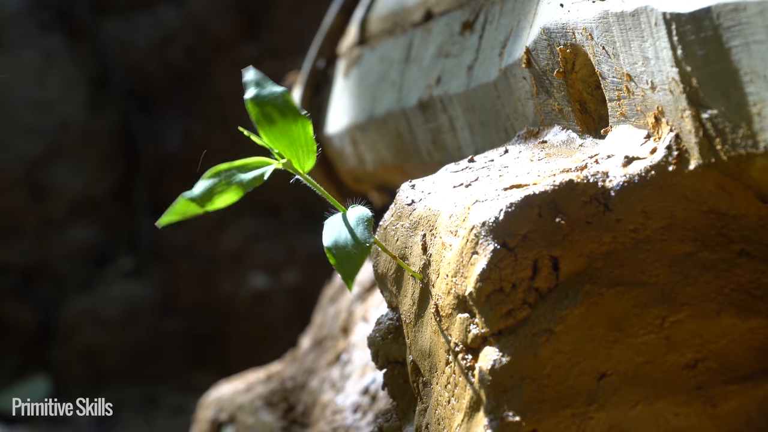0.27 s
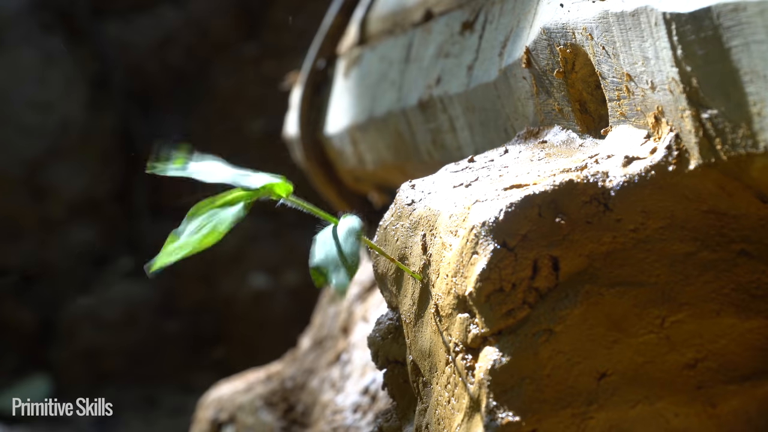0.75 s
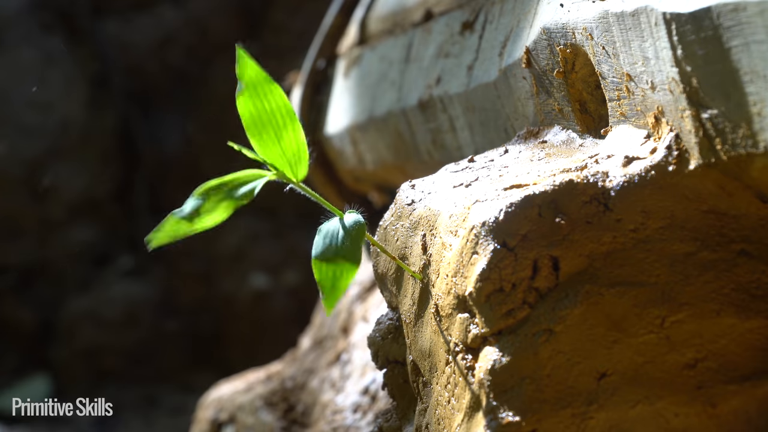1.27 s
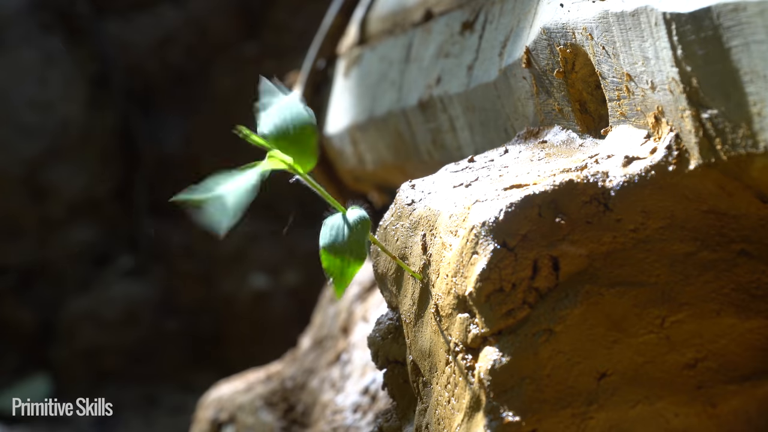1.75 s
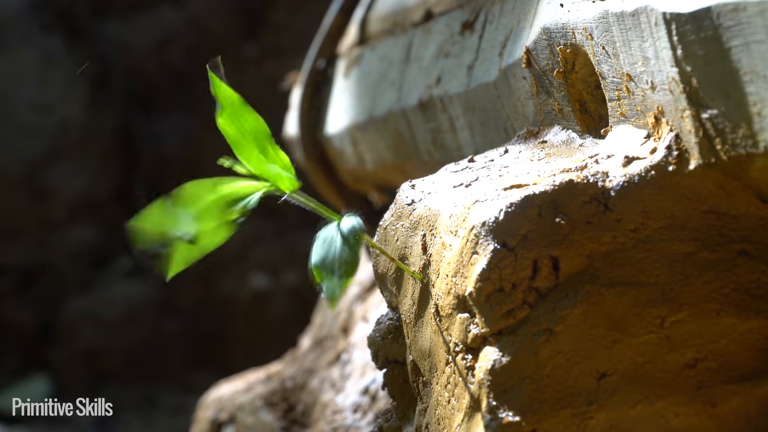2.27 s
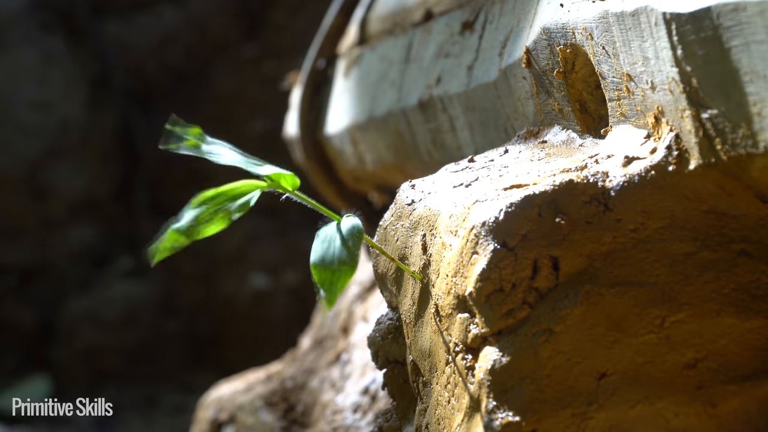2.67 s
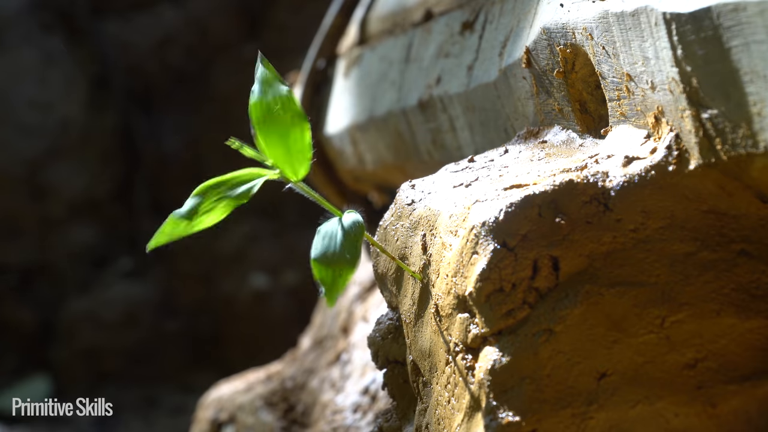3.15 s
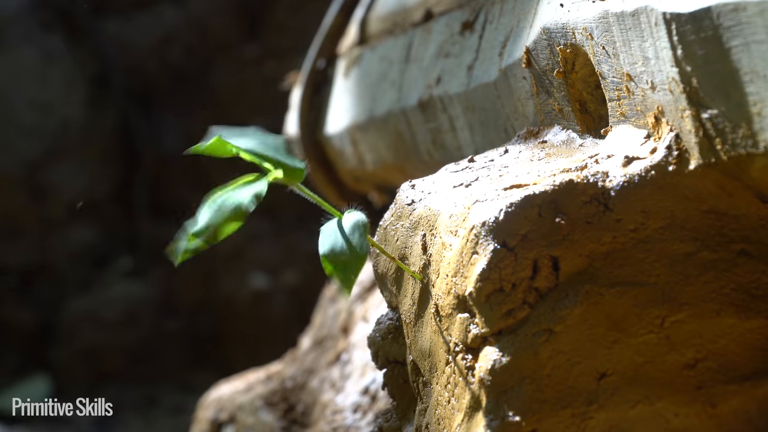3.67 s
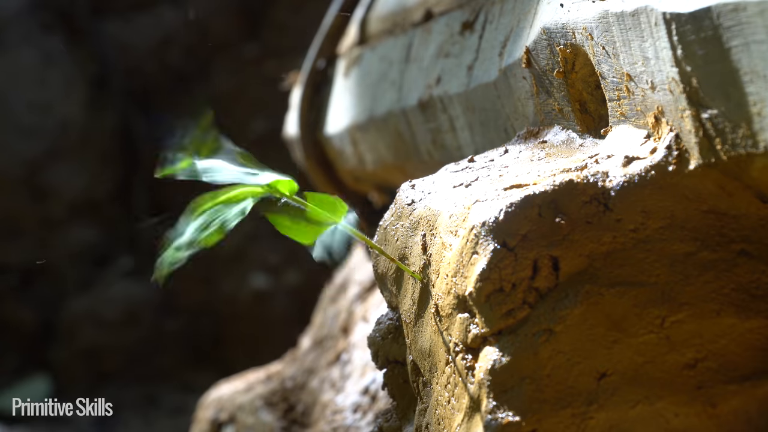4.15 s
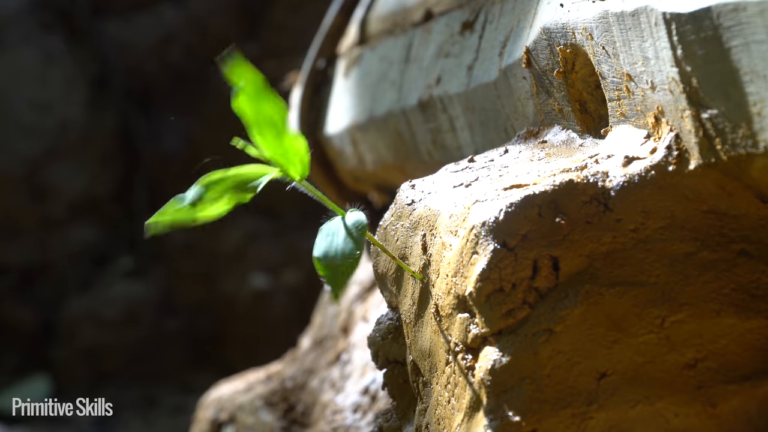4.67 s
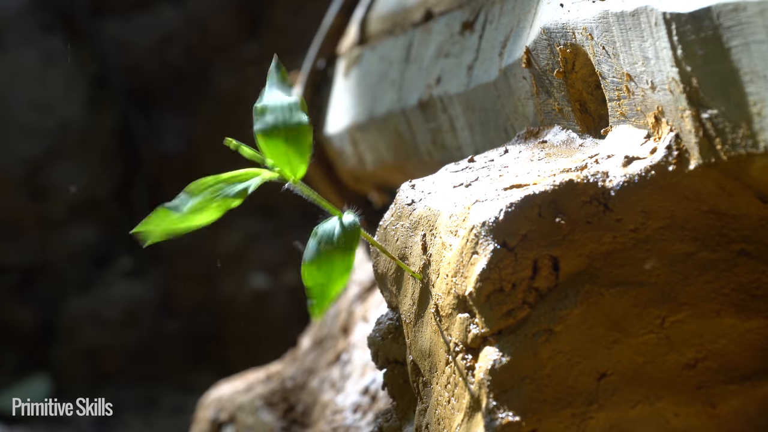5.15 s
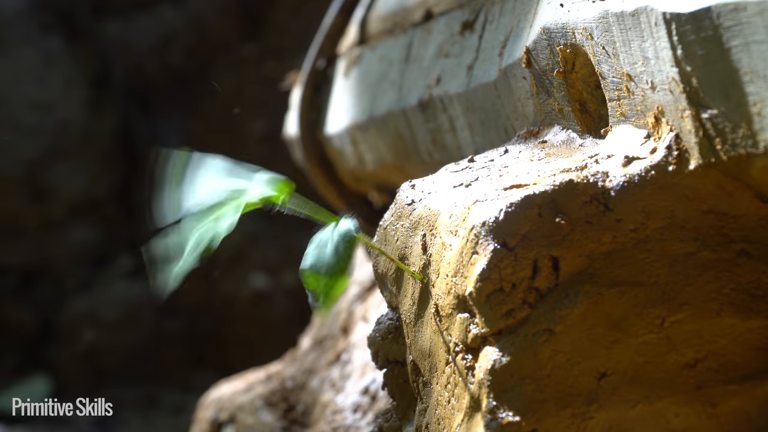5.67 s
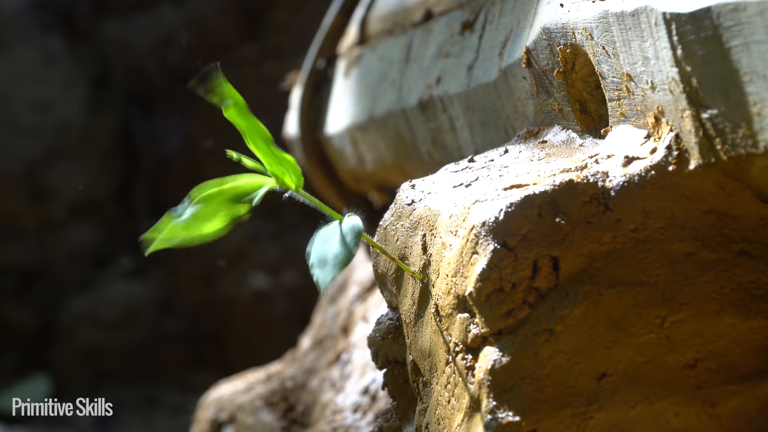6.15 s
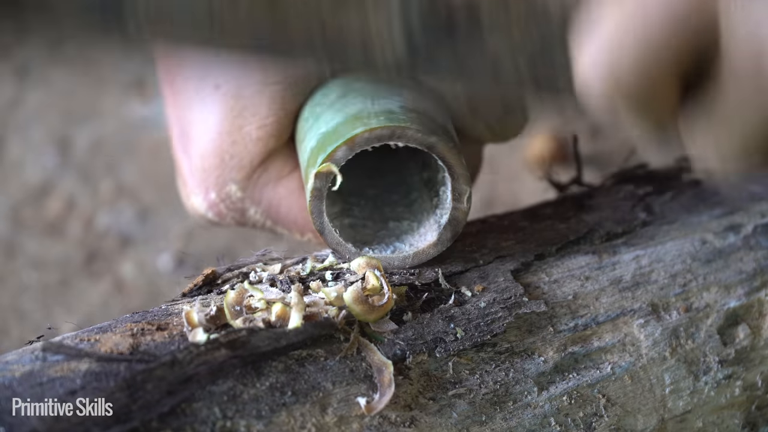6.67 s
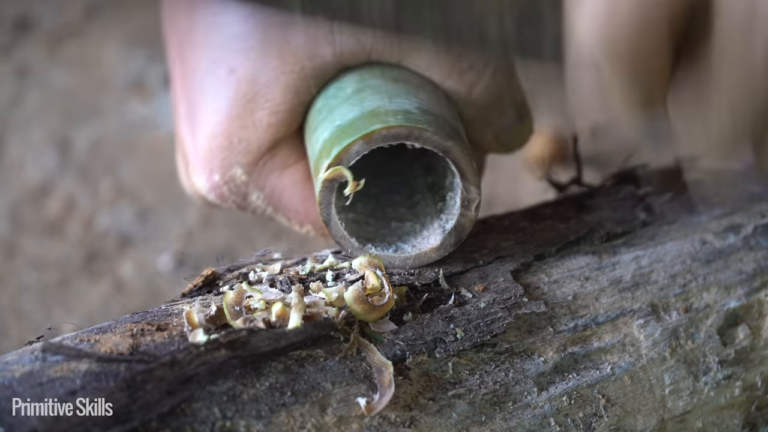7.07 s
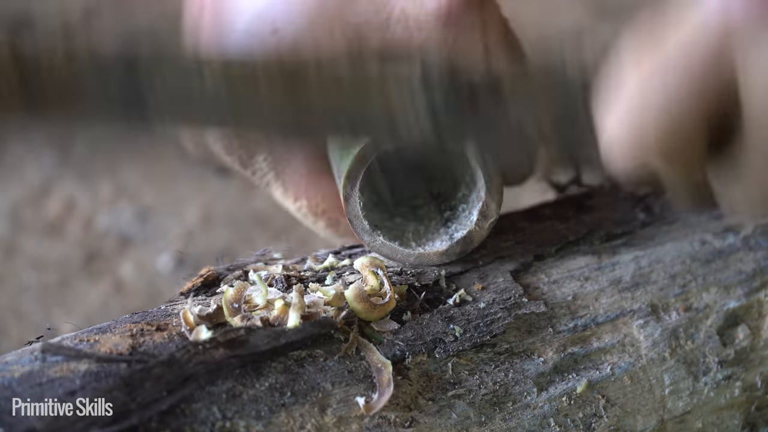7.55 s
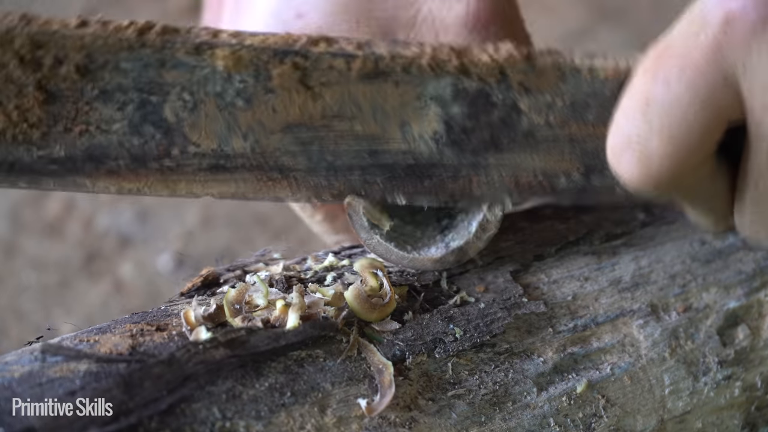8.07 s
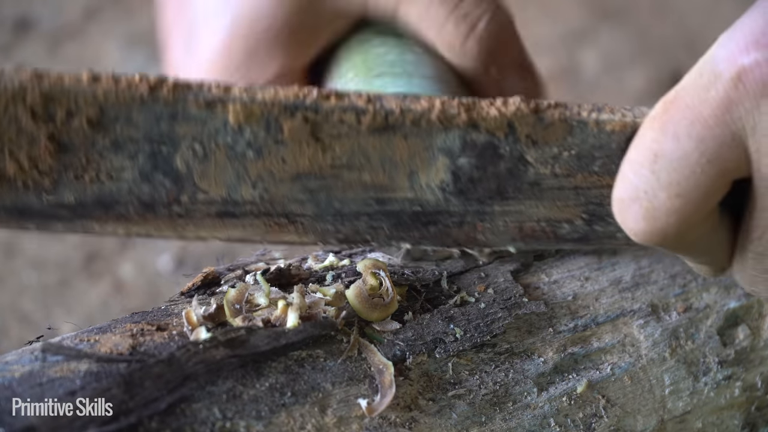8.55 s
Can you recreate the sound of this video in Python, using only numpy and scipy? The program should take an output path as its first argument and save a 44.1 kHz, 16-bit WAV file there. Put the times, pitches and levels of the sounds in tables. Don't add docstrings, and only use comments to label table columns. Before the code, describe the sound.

Breathy air whistles around nine hundred hertz and hisses through valve holes as a bellows is pushed and pulled, with wooden slaps and thumps starting the pushes and small ticks and pops starting the pulls. Then a hard cut to a log: quick, dry blade hits on bamboo, about three per second, each with a brief chattering slice and gritty scrape, plus a rattling knock midway. Close, dry outdoor sound, soft stream murmur, loudest blows slightly flattened.

```python
import sys
import numpy as np
from scipy import signal
from scipy.fft import rfft, irfft
from scipy.io import wavfile
from scipy.ndimage import uniform_filter1d

SR = 44100
rng = np.random.default_rng(int(sys.argv[2]) if len(sys.argv) > 2 else 0)


def elevation(decibels):
    levels = np.asarray(decibels, float)
    return 10 ** (levels / 20)


def transcribe(u):
    v = np.clip(np.atleast_2d(u).T, -1, 1)
    q = np.round(v * 32767).astype(np.int16)
    wavfile.write(sys.argv[1], SR, q)


N = 388080


def walk(rate):
    hold = int(SR / rate)
    steps = np.repeat(rng.standard_normal(N // hold + 1), hold)
    return 0.95 * uniform_filter1d(uniform_filter1d(steps, hold), hold)[:N]


def unit(x):
    return x / np.sqrt(np.mean(x ** 2))


def resonate(x, peaks):
    out = 0
    for k, (hz, width, db) in enumerate(peaks):
        out = out + (-1) ** k * elevation(db) * signal.lfilter(*signal.iirpeak(hz, hz / width, SR), x)
    return out


def lift(x, peaks):
    return x + sum(elevation(db) * 3 * resonate(x, [(hz, width, 0)]) for hz, width, db in peaks)


def coloured(x, spectrum, flicker_db, rate):
    hz, db = np.transpose(spectrum)
    octave = np.log2(np.maximum(np.fft.rfftfreq(N, 1 / SR), 1))
    shaped = rfft(x) * elevation(np.interp(octave, np.log2(hz), db, left=-120, right=-120))
    out = np.zeros(N)
    for centre in np.arange(np.log2(hz[0]) - 0.5, np.log2(hz[-1]) + 0.5, 0.5):
        band = irfft(shaped * np.clip(1 - 2 * abs(octave - centre), 0, 1), N)
        out += band * elevation(flicker_db * walk(rate))
    return unit(out)


def strike(events, modes, contact_ms, detune, sides=1):
    out, t = np.zeros(N), np.arange(8192) / SR
    push = np.hanning(int(contact_ms * SR / 1000) + 3)
    hz, gain_db, t60 = np.transpose(modes)[:, :, None]
    facing = sides ** np.arange(len(modes))[:, None]
    chances = rng.standard_normal((len(events), 2, len(modes), 1))
    for (s, db), (level_chance, pitch_chance) in zip(events, chances):
        decay = np.exp(-np.log(1000) * t / np.minimum(t60, 0.08))
        rings = facing * elevation(gain_db + 2 * level_chance) * decay
        swing = np.sin(2 * np.pi * hz * (1 + detune * pitch_chance) * t)
        hit = -np.convolve((rings * swing).sum(0), push)
        i = int(s * SR)
        out[i:i + len(hit)] += elevation(db) * hit / abs(hit).max()
    return out


def gate(t, start, end, rise, fall):
    return np.clip((t - start) / rise, 0, 1) * np.exp(-np.clip(t - end, 0, None) / fall)


# (frequency [Hz], level [dB])
YARD_COLOUR = [(15, -31), (25, -2), (117, -5), (287, -3.5), (898, -3.5), (1680, -16), (3300, -13),
               (3580, -15), (3990, -20.5), (5240, -20), (5840, -26.5), (13200, -34.5), (16400, -46)]
# (frequency [Hz], level [dB])
LOG_COLOUR = [(20, -10), (90, -9.5), (200, -6), (450, -6.5), (650, -3), (900, -1.5), (1150, -11),
              (2200, -17), (3300, -14), (4200, -18), (6000, -27.5), (10000, -32.5), (15000, -41),
              (16400, -53)]
# (time [s], length [s], frequency [Hz], level [dB])
PUFFS = [
    (2.38, .06, 55.7, -44),
    (5.151, .12, 76, -32.5),
    (5.324, 0.052, 81, -34.5),
    (7.795, 0.021, 104, -32),
    (8.383, .04, 90, -35),
]


def outdoors(t):
    near_log = np.clip((t - 6.58) / 0.01, 0, 1)
    yard = elevation(-40.5) * coloured(rng.standard_normal(N), YARD_COLOUR, 1.8, 9)
    bank = elevation(-37) * coloured(rng.standard_normal(N), LOG_COLOUR, 1.2, 11)
    puffs = 0
    for s, length, hz, db in PUFFS:
        puffs = puffs + elevation(db) * gate(t, s, s + length, 0.014, 0.014) * np.sin(2 * np.pi * hz * (t - s))
    return (1 - near_log) * yard + near_log * bank + puffs


def stroke_levels(t, strokes, flow, spout, barrel, leak):
    jet_gain, spout_gain, barrel_gain = np.zeros((3, N))
    leak_s, leak_db = leak
    for start, end, force_db, sag_db in strokes:
        on = (t >= start) & (t < end)
        share = (t[on] - start) / (end - start)
        sag = sag_db * np.exp(-((share - 0.44) / 0.15) ** 2)
        flow_db = np.interp(share, *np.transpose(flow)) + sag
        jet_gain[on] = elevation(force_db + flow_db)
        for gain, (db, slope, drift_db) in ((spout_gain, spout), (barrel_gain, barrel)):
            gain[on] = elevation(force_db + db + slope * flow_db + drift_db * share)
        spout_gain[(t >= start - leak_s) & (t < start)] = elevation(leak_db)
    return uniform_filter1d(np.array([jet_gain, spout_gain, barrel_gain]), size=400)


# (frequency [Hz], width [Hz], level [dB])
BARREL_PEAKS = [(270, 49, 0.71), (111, 147, 3.2)]
# (frequency [Hz], level [dB])
RUMBLE_COLOUR = [(20, -17), (60, -21.5), (130, -11.5), (220, -4.5), (420, -6.5), (650, -4.5), (820, -1),
                 (1000, -39)]


def barrel_rumble(push_gain, pull_gain):
    noise = rng.standard_normal(N)
    tumble = np.where(push_gain > pull_gain, noise, 0.3 * lift(noise, BARREL_PEAKS))
    return (push_gain + pull_gain) * coloured(tumble, RUMBLE_COLOUR, 2.85, 18)


# (frequency [Hz], level [dB])
PUSH_COLOUR = [(900, 1), (1080, -4.5), (2000, -2.5), (3200, -4.5), (4300, -10.5), (4800, -19.5),
               (6100, -24), (6700, -28.5), (12000, -32.5), (16000, -51)]
# (frequency [Hz], level [dB])
PULL_COLOUR = [(900, -21), (1080, -6.5), (1400, -0.5), (2400, -5.5), (3200, -7), (4300, -14.5), (4900, -19),
               (6100, -25.5), (12000, -32), (16000, -40)]
# (frequency [Hz], width [Hz], level [dB])
PUSH_HOLE = [(1210, 112, -2.5), (1556, 280, -11.5), (2127, 44, -8), (2577, 31, -11), (3065, 320, -14.5),
             (5790, 140, -12)]
# (frequency [Hz], width [Hz], level [dB])
PULL_HOLE = [(1210, 155, -8.5), (2060, 65, -8.5), (2430, 110, -8.5), (3114, 63, -8.5), (4100, 93, -12)]


def valve_hiss(push_gain, pull_gain):
    push = coloured(lift(rng.standard_normal(N), PUSH_HOLE), PUSH_COLOUR, 1.2, 15)
    pull = coloured(lift(rng.standard_normal(N), PULL_HOLE), PULL_COLOUR, 1.2, 15)
    return push_gain * push + pull_gain * pull


# (frequency [Hz], width [Hz], level [dB])
SPOUT_NOTES = [(905.3, 37.6, -2.5), (830.5, 62.5, -9.5), (775.4, 57, -13.5)]
# (time [s], half length [s], level [dB])
SPOUT_SWELLS = [(0, 0.0083, 15), (0.4, 0.018, 8), (0.733, 0.052, 7), (1.041, 0.051, 9), (1.37, .008, -6),
                (1.503, 0.033, -8), (1.595, .007, -5), (1.765, .008, -6), (1.63, 0.038, 5),
                (1.663, .008, 0), (1.865, 0.046, 4.5), (2.256, 0.03, 3), (2.782, 0.027, 5),
                (3.225, 0.035, 1.5), (3.375, .007, -7), (3.412, .02, 6), (3.51, .03, -4), (3.56, .03, -2),
                (3.997, 0.032, 6), (4.54, .02, 7.5), (4.79, 0.011, 6), (5.004, 0.017, 5), (5.418, .03, 2),
                (5.508, 0.011, -12), (5.743, 0.027, 7.5), (6.011, 0.043, 11), (6.294, 0.042, 5)]
# (time [s], length [s], level [dB])
SPOUT_GASPS = [(0.297, .02, -31), (0.42, 0.01, -14), (1.268, 0.0032, -12.5), (1.278, 0.0037, -15),
               (1.388, 0.019, -20), (1.435, 0.014, -19.5), (1.612, 0.028, -15.5), (1.675, 0.011, -15),
               (1.785, 0.0051, -12.5), (1.807, 0.011, -18), (1.83, .014, -16.5), (3.07, 0.019, -20),
               (3.173, 0.013, -18.5), (3.33, 0.014, -18), (3.39, 0.037, -15), (3.444, 0.015, -16),
               (3.463, 0.015, -14.5), (3.543, 0.033, -15.5), (3.596, 0.018, -15), (3.672, 0.013, -17.5),
               (4.611, 0.0066, -18), (4.921, 0.01, -17.5), (5.133, 0.018, -18.5), (5.164, 0.0068, -15.5),
               (5.195, 0.0093, -12.5), (5.218, 0.009, -12.5), (5.242, 0.027, -16.5), (5.305, 0.016, -17.5),
               (5.402, 0.039, -17.5), (5.519, 0.018, -24)]


def spout_song(t, gain):
    swell_db = sum(np.interp(t, [s - 2 * half, s, s + 2 * half], [0, db, 0]) for s, half, db in SPOUT_SWELLS)
    eddies = resonate(rng.standard_normal(N) * elevation(2.46 * walk(35)), [(787, 240, 0)])
    breath = unit(resonate(eddies, SPOUT_NOTES))
    gasps = sum(elevation(db) * gate(t, s, s + length, 0.0013, 0.0034) for s, length, db in SPOUT_GASPS)
    note_hz = 902 + 9 * walk(60)
    gasp_note = np.sin(2 * np.pi * np.cumsum(note_hz) / SR) * elevation(1.5 + 0.79 * walk(150))
    song = gain * elevation(swell_db) * breath / (1 + 9.0 * gasps) + gasps * gasp_note
    return signal.lfilter(*signal.iirnotch(973, 973 / 65, SR), song)


# (flap opens [s], air stops [s], force [dB], sag of the arm in mid-stroke [dB])
PUSH_STROKES = [
    (.361, 1.201, -24.5, -6),
    (2.14, 2.958, -24, -3),
    (3.907, 4.745, -25, -0.5),
    (5.675, 6.49, -25.5, 0.5),
]
# (flap opens [s], air stops [s], force [dB], sag of the arm in mid-stroke [dB])
PULL_STROKES = [
    (-.53, 0.2, -33.5, -0.23),
    (1.274, 2.02, -31, 0.27),
    (3.025, 3.79, -31.5, -0.34),
    (4.808, 5.567, -31.5, -0.17),
]
# (share of the stroke [0-1], level under full flow [dB])
PUSH_AIR = [(0, -13.5), (.04, -4.5), (.12, 1.5), (.7, -0.5), (.9, -5.5), (.96, -16), (1, -29)]
# (share of the stroke [0-1], level under full flow [dB])
PULL_AIR = [(0, -7.5), (.06, -12), (.1, -4), (.28, 1), (0.858, -2), (.96, -10.5), (1, -14)]
# (level over the jet [dB], slope [dB per dB], drift over the stroke [dB])
PUSH_SPOUT = (-0.8, 0.43, -3)
PULL_SPOUT = (5.2, 0.76, 4.9)
PUSH_BARREL = (-7.5, 0.5, -2)
PULL_BARREL = (3, .9, -2.5)
# (lead [s], level [dB])
PUSH_LEAK = (0.054, -37)
PULL_LEAK = (0.024, -38.5)


def bellows(t):
    push = stroke_levels(t, PUSH_STROKES, PUSH_AIR, PUSH_SPOUT, PUSH_BARREL, PUSH_LEAK)
    pull = stroke_levels(t, PULL_STROKES, PULL_AIR, PULL_SPOUT, PULL_BARREL, PULL_LEAK)
    push_jet, push_spout, push_barrel = push
    pull_jet, pull_spout, pull_barrel = pull
    song = spout_song(t, push_spout + pull_spout)
    return song + valve_hiss(push_jet, pull_jet) + barrel_rumble(push_barrel, pull_barrel)


# (time [s], level [dB])
SETTLE_TIMES = [
    (.213, -23.5),
    (2.013, -22),
    (3.796, -24.5),
    (5.58, -22),
]
# (time [s], level [dB])
TICK_TIMES = [
    (1.282, -5),
    (3.047, -6.5),
    (4.816, -5),
]
# (time [s], level [dB])
POP_TIMES = [
    (1.3347, -4),
    (3.1026, -3),
    (4.874, -4),
]
# (frequency [Hz], level [dB], t60 [s])
SETTLE_MODES = [(138, 0, 0.023), (260, -29, .02)]
# (frequency [Hz], level [dB], t60 [s])
TICK_MODES = [(2770, 4, 0.0074), (640, 7.5, 0.014), (2470, 7, 0.0056), (1740, -22, 0.0049),
              (1190, -26, 0.0094), (3350, -11, .005), (116, 2.5, 0.018)]
# (frequency [Hz], level [dB], t60 [s])
POP_MODES = [(684, 14.5, 0.0053), (284, 0, 0.02), (1270, 3, 0.0042), (2400, -21, .003), (110.3, -36, 0.023)]


def flaps_settle():
    settle = strike(SETTLE_TIMES, SETTLE_MODES, 1.5, 0.05)
    tick = strike(TICK_TIMES, TICK_MODES, 0.29, 0.038, sides=-1.01)
    suck = strike([(s - 0.0007, db - 15) for s, db in POP_TIMES], POP_MODES, 0.52, 0.03)
    pop = strike(POP_TIMES, POP_MODES, 0.19, 0.027)
    return settle + tick + suck - pop


# (frequency [Hz], level [dB], t60 [s])
SLAP_MODES = [(556, -0.5, 0.025), (920, -7.5, 0.027), (1247, -6, 0.053), (1590, 1.5, 0.0091),
              (2070, -14, 0.013), (2660, -1.5, 0.0041), (352, -8, 0.044)]
# (frequency [Hz], level [dB], t60 [s])
THUMP_MODES = [(217, 4.5, 0.047), (404, 4, 0.022), (69, -11, 0.1)]


def flaps_slam(t):
    slaps, thumps, clicks = [], [], []
    for s, *_ in PUSH_STROKES:
        slaps += [(s, -10.5), (s + 0.005, -20)]
        thumps.append((s + 0.01406, -7.5))
        clicks.append((s + 0.01406, -19))
    level = sum(elevation(db - 12.0) * gate(t, s, s + 0.0017, 0.00064, 0.0029) for s, db in slaps + clicks)
    rough = resonate(rng.standard_normal(N), [(1100, 1600, 0)])
    rattle = level * unit(resonate(rough, [(890, 700, -6.5), (2200, 4400, -12)]))
    slap = strike(slaps, SLAP_MODES, 0.2, 0.18, sides=-0.97)
    return slap + rattle + strike(thumps, THUMP_MODES, 0.55, 0.027)


# (time [s], blow level [dB], first bite level [dB], level of the air ring in the tube [dB],
#  edge meets the log after the blow [ms])
BLADE_CUTS = [
    (6.6083, -1.5, -12.5, -4, 16.4),
    (6.8934, 0.5, -15.5, -4, 17),
    (7.1873, -0.5, -20, -7.5, 16),
    (7.4897, 0, -14.5, -6, 8.4),
    (7.7816, -1.5, -10, -7.5, 15),
    (8.0808, 1, -8, -7.5, 16.5),
    (8.368, -2.5, -26, -5, 10),
]
# (frequency [Hz], level [dB], t60 [s])
TUBE_MODES = [(1377, -6.5, 0.041), (2300, 8.5, 0.013), (2590, -4.5, 0.026), (3360, 0.5, 0.023),
              (1940, -14.5, 0.049), (4400, -34, 0.0047), (1096, 0, 0.011)]
# (frequency [Hz], level [dB], t60 [s])
HOLLOW_MODES = [(860, 5, 0.022), (572, -11.5, 0.18)]


def blade_blows():
    wall = strike([(s, db) for s, db, *_ in BLADE_CUTS], TUBE_MODES, 0.1, 0.048, sides=-1.004)
    return wall + strike([(s, db) for s, _, _, db, _ in BLADE_CUTS], HOLLOW_MODES, 0.12, 0.021)


def fibre_snaps():
    return rng.standard_normal(N) * elevation(2 * walk(700))


def blade_bite(t):
    cracks = sum(elevation(db) * gate(t, s, s + 0.00054, 0.00013, 0.0028) for s, _, db, *_ in BLADE_CUTS)
    splinter = elevation(-23) * gate(t, 7.5172, 7.5187, 0.001, 0.001)
    return (cracks + splinter) * unit(resonate(fibre_snaps(), [(3560, 850, 8.5), (8750, 7700, -8)]))


# (frequency [Hz], width [Hz], level [dB])
BLADE_PEAKS = [(3370, 360, 0.5), (2170, 1040, -6.5), (4400, 1400, -6.5), (7100, 410, -16.5),
               (7500, 590, -19.5), (9840, 410, -13), (11900, 2700, -21.5), (13800, 2500, -24),
               (590, 210, -10), (920, 640, -3)]
# (starts after the blow [ms], ends after the blow [ms], level [dB])
CUT_SLICES = [
    (3.3, 11, -16.5),
    (4.7, 8.1, -6.5),
    (5.9, 10.4, -8),
    (10.7, 12, -16),
    (3.2, 8.9, -15),
    (1.3, 4.9, -17),
    (5.9, 13.8, -11.5),
]


def blade_slice(t):
    level = 0
    for (s, *_), (start_ms, end_ms, db) in zip(BLADE_CUTS, CUT_SLICES):
        level = level + elevation(db) * gate(t, s + start_ms / 1000, s + end_ms / 1000, 0.0011, 0.0022)
    return level * unit(resonate(fibre_snaps(), BLADE_PEAKS))


# (frequency [Hz], level [dB])
SCRAPE_COLOUR = [(59, -23), (100, -0.5), (691, -1.5), (891, 3), (1100, -15), (1230, 2), (1520, -15.5),
                 (2470, -7), (6150, -23), (9610, -23), (16000, -33)]


def blade_scrape(t):
    level = 0
    for s, *_, log_ms in BLADE_CUTS:
        meets = s + log_ms / 1000
        level = level + elevation(-25) * gate(t, meets - 0.008, meets + 0.0195, 0.011, 0.027)
    grit = fibre_snaps() * elevation(2.5 * walk(250))
    return level * coloured(lift(grit, BLADE_PEAKS[:6]), SCRAPE_COLOUR, 2.2, 150)


# (time [s], level [dB], frequency [Hz])
LOG_KNOCKS = [
    (6.914, -19, 248),
    (7.21, -27, 413),
    (7.5174, -2.5, 304),
    (7.5229, -4.5, 370),
    (7.533, -10.5, 442),
    (7.543, -13.5, 240),
    (7.808, -29, 300),
    (8.397, -33, 283),
    (8.405, -19, 165),
]


def log_knocks():
    out = np.zeros(N)
    for s, db, hz in LOG_KNOCKS:
        modes = [(hz, 0, 0.045), (1.61 * hz, -4, 0.035), (0.57 * hz, -9, 0.04)]
        out += strike([(s, db)], modes, 0.24, 0.028)
    return out


def blade(t):
    return blade_blows() + blade_bite(t) + blade_slice(t) + blade_scrape(t) + log_knocks()


def scene():
    t = np.arange(N) / SR
    soft = signal.butter(2, 4200, fs=SR, output="sos")
    valves = signal.sosfilt(soft, flaps_settle() + flaps_slam(t))
    no_bass = signal.butter(2, 55, "high", fs=SR, output="sos")
    knocks = signal.sosfilt(no_bass, valves + blade(t))
    return (outdoors(t) + bellows(t) + knocks)[None]


def band_limit(x):
    return signal.sosfilt(signal.butter(12, 16510, fs=SR, output="sos"), x)


def record(dry):
    top = signal.ellip(8, 0.5, 50, 16000, fs=SR, output="sos")
    cut = signal.sosfilt(top, dry)
    clip = 0.64
    flat = clip * np.tanh((abs(cut) / clip) ** 3) ** (1 / 3) * np.sign(cut)
    return band_limit(signal.sosfilt(top, flat))


dry = scene()
out = record(dry)
transcribe(out)
```